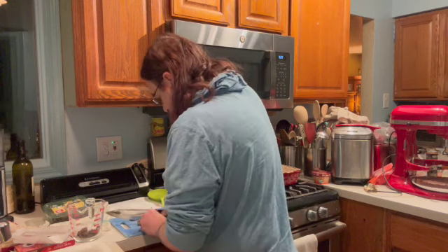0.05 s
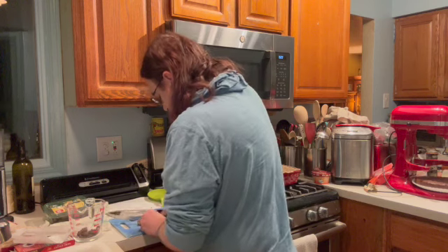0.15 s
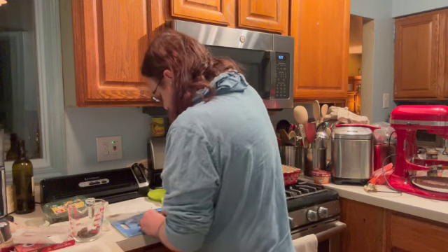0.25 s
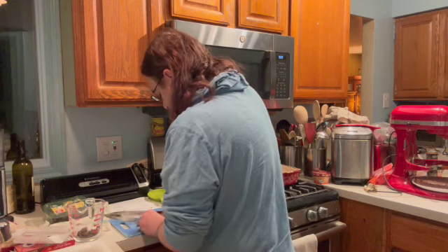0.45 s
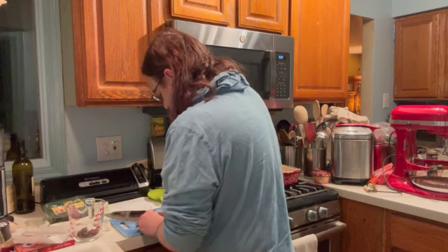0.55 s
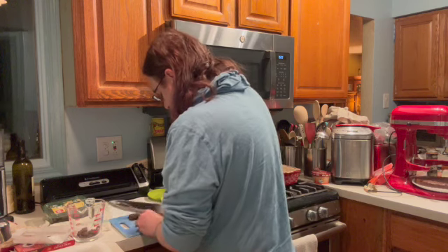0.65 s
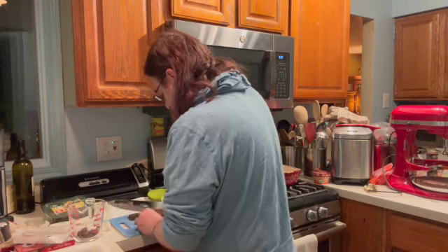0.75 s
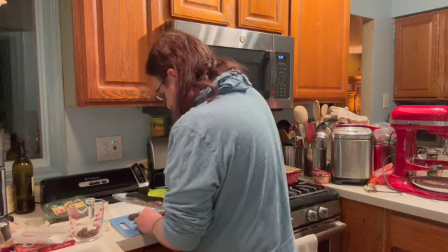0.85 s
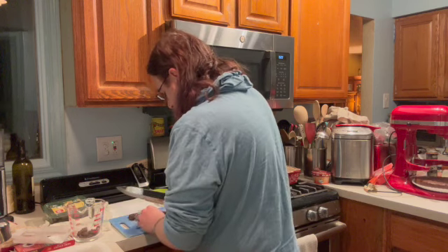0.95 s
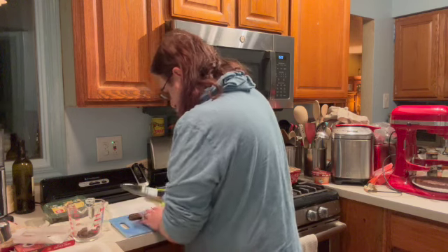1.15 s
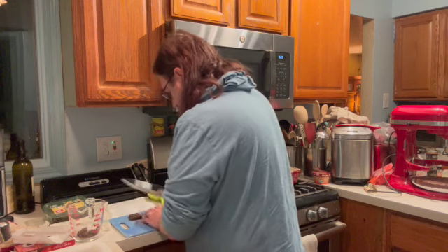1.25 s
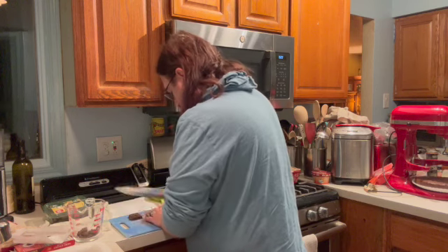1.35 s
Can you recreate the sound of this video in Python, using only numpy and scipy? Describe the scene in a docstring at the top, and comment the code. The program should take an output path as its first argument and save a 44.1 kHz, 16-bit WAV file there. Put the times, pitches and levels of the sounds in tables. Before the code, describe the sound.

One knife chop lands on a plastic cutting board at about 0.2 seconds: a very brief crunch of food runs into a sharp, hollow bang, with a low thump from the counter. Board and blade ring briefly, fading by about 0.5 seconds in a small kitchen. Faint scrapes of knife and hand on the board follow until about 1.4 seconds. A low appliance hum continues throughout.

```python
"""One chop of a kitchen knife onto a plastic cutting board, in a small, hard-walled kitchen.
The blade crunches through a piece of food in a spray of tiny fractures, then bangs onto the board.
Board and blade ring, the counter beneath booms and the room answers with a short tail.
Faint scrapes of knife and hand on the board follow, over the hum of an appliance."""
import sys
import numpy as np
from scipy import signal
from scipy.fft import rfft, irfft
from scipy.io import wavfile
from scipy.ndimage import uniform_filter1d

SR = 44100
rng = np.random.default_rng(int(sys.argv[2]) if len(sys.argv) > 2 else 0)


def wrap_up_sound(samples):
    """Save the sound to the file named by the first command line argument, as 16-bit audio."""
    columns = np.atleast_2d(samples).T
    # keep every value between -1 and 1, then stretch to whole-number steps
    tamed = np.clip(columns, -1, 1)
    steps = np.round(tamed * 32767).astype(np.int16)
    wavfile.write(sys.argv[1], SR, steps)


N = 61739
T = np.arange(N) / SR
HZ = np.maximum(np.arange(N // 2 + 1) * SR / N, 1)
BITE_S, PRESS_S, CHOP_S = 0.2068, 0.2197, 0.2279   # the blade bites, bears down, meets the board

# stereo image of the noise layers: freq_hz, left_right_correlation
STEREO_IMAGE = [(120, 0.92), (220, -0.023), (350, 0.2), (700, .1), (1400, 0.22), (2800, 0.094),
                (5000, 0.16), (9000, -.2)]
# tone of the room's still air: freq_hz, gain_db
AIR_EQ = [(25, -11.5), (55, 3), (110, 0.5), (190, -8.5), (300, -17), (470, -16), (800, -27), (2000, -33.5),
          (5000, -38.5), (13000, -45), (15000, -67.5)]
# appliance motor and mains hum: pitch_hz, rms_db
HUM_PARTIALS = [(56.6, -44.5), (119.4, -53), (239.5, -71.5)]
# knife and hand sliding on the board: peak_s, hiss_db, rise_s, t60_s, tilt_db_per_octave, ring_db
SCRAPE_STROKES = [(.06, -60, 0.3, 0.38, -1.5, -76.5), (.51, -64.5, 0.29, 0.84, -0.5, -86),
                  (0.593, -61.5, 0.034, 0.34, 2, -64), (.66, -68, 0.24, 1.35, 2, -76),
                  (0.796, -63, 0.15, .3, -1.5, -69), (1.08, -66, 0.049, 0.49, -5, -91.5),
                  (1.13, -72, 0.18, 2.5, 2.5, -86), (1.34, -61.5, 0.05, 0.24, -3.5, -81.5),
                  (1.398, -65.5, 0.069, 0.34, -2, -70.5)]
# tone of the sliding hiss: freq_hz, gain_db
SCRAPE_EQ = [(200, -2), (500, 5), (1200, -6.5), (2500, -2), (5000, -8), (8000, -8.5), (10000, -22),
             (13300, -6.5), (15000, -44)]
# resonances that sliding excites: pitch_hz, strength_db
SCRAPE_MODES = [(860, -4.5), (1110, 3), (1500, -6.5), (1682, -2), (2635, -4), (4900, -9.5)]
# tone of the reverb: freq_hz, gain_db
REVERB_EQ = [(100, -7), (250, -8), (450, 1), (800, -4.5), (1600, -2), (2600, -2), (4000, -6), (6500, -10),
             (8600, -17.5), (10500, -26.5), (13500, -26), (14800, -61)]
# decay of the reverb: freq_hz, t60_s
REVERB_DECAY = [(100, 0.33), (500, 0.32), (2000, 0.36), (5000, .32), (8000, .25), (13000, 0.21)]
# low room modes: pitch_hz, level_db, attack_s, t60_s
ROOM_MODES = [(84, -29.5, 0.013, .25), (109.8, -26, 0.079, .13)]
# the counter flexing, then settling: start_s, pitch_hz, level_db, attack_s, hold_s, t60_s
COUNTER_BOOMS = [(0.2378, 103.4, -12.5, .017, .009, .045), (0.362, 88.5, -36, 0.024, 0.0026, .12)]
# tone of breaking food: freq_hz, gain_db
CRUNCH_EQ = [(100, 1.5), (220, -9), (400, 2), (700, -1.5), (1200, 2), (1800, -8), (3200, -9), (6000, -21.5),
             (14000, -50)]
# modes of the board: pitch_hz, strength_db, t60_s
BOARD_TONES = [(409.5, 0.5, .13), (597.5, -2.5, .16), (618.6, 4.5, .25), (753.5, -1, .17), (896, -4, 0.17),
               (1055, -6, .26), (1508, -1, .37), (1625, -3, .27), (1690, -1, 0.2), (1900, -2.5, 0.3)]
# modes of the blade: pitch_hz, strength_db, t60_s
BLADE_TONES = [(2317, 3, 0.28), (2400, -5, .34), (2634, -7.5, .26), (3028, -5.5, 0.19), (3105, 1, .15),
               (3292, -2, .16), (3707, -3, .22), (4266, -6.5, .2), (8830, -6, 0.14)]
# dense, quickly damped ringing of board and worktop: freq_hz, gain_db
CLACK_EQ = [(150, -17.5), (280, -18.5), (420, -8), (640, 6), (1050, -2), (1650, 2), (2050, -9.5), (2400, 1),
            (3100, 3.5), (4100, -8.5), (4800, -4.5), (6500, -17.5), (9000, -19.5), (13500, -28.5),
            (14800, -57)]
# tone of the edge's first contact: freq_hz, gain_db
CRACK_EQ = [(200, -21), (900, -4), (1900, -2.5), (2800, 2), (4100, -6), (5000, -6.5), (9000, -15),
            (13000, -17.5), (16000, -34)]


def from_db(db):
    """Decibels to gain."""
    return 10 ** (np.asarray(db) / 20)


def unit_rms(x):
    """Scale to an rms of 1."""
    return x / np.sqrt(np.mean(x ** 2) + 1e-20)


def at_hz(curve, hz):
    """Read a curve on a log-frequency axis."""
    freqs, values = np.transpose(curve)
    return np.interp(np.log(hz), np.log(freqs), values)


def drift(per_s):
    """Slow random wander with a spread of about 1."""
    knots = rng.standard_normal(4096)
    return np.interp(T * per_s, np.arange(len(knots)), knots)


def envelope(start, attack, hold, t60):
    """Smooth rise, hold and exponential release, all in seconds."""
    age = T - start
    rise = np.sin(np.pi / 2 * np.clip(age / attack, 0, 1)) ** 2
    return rise * from_db(-60 * np.maximum(age - attack - hold, 0) / t60)


def stereo_noise(eq, tilt_db=0):
    """Shaped noise, centred in the bass and wide above, tilted by tilt_db per octave; rms 1."""
    mid, side = rfft(rng.standard_normal((2, N)))
    correlation = at_hz(STEREO_IMAGE, HZ)
    pair = np.sqrt(1 + correlation) * mid + np.sqrt(1 - correlation) * side * np.array([[1], [-1]])
    return unit_rms(irfft(pair * from_db(at_hz(eq, HZ) + tilt_db * np.log2(HZ)), N))


def low_tone(start, hz, db, attack, hold, t60):
    """A sine that swells and dies away."""
    return from_db(db) * envelope(start, attack, hold, t60) * np.sin(2 * np.pi * hz * (T - start))


def through_modes(burst, lift_db, width_hz=37):
    """Gather a burst's energy round the modes of board and blade, keeping its broad tone."""
    mid_side = np.array([[1, 0.91], [1, -1]]) / np.sqrt(2)
    spectrum = rfft(mid_side @ burst)
    peaks = 1 + sum(from_db(lift_db + db) ** 2 / (1 + (2 * (HZ - hz) / width_hz) ** 2)
                    for hz, db, _ in BOARD_TONES + BLADE_TONES)
    power = abs(spectrum) ** 2
    fine, broad = (abs(uniform_filter1d(power, size=bins)) + 1e-9 for bins in (60, 600))
    flatten = broad / fine   # evens out the noise's own chance peaks
    gain = np.sqrt(flatten * peaks / uniform_filter1d(peaks, size=600))
    gate = np.clip((T - CHOP_S) / 0.0012, 0, 1)   # no ringing ahead of the hit
    return mid_side @ irfft(spectrum * gain, N) * gate


def room_tone():
    """The still air of the kitchen: a soft, dark bed of noise."""
    return from_db(-56.5) * stereo_noise(AIR_EQ)


def appliance_hum(waver_db=0.47):
    """A motor and the mains drone low, each partial wavering slightly in level."""
    hum = 0
    for hz, db in HUM_PARTIALS:
        gain = np.sqrt(2) * from_db(db + waver_db * drift(per_s=22))
        hum = hum + gain * np.sin(2 * np.pi * (hz * T + rng.random()))
    return hum


def scrapes(width_hz=53, grain_db=1):
    """Knife and hand slide in soft, grainy strokes that hiss and set the board ringing."""
    resonance = sum(from_db(db) / (1 + 2j * (HZ - hz) / width_hz) for hz, db in SCRAPE_MODES)
    ring = unit_rms(irfft(rfft(rng.standard_normal((2, N))) * resonance, N))
    slides = 0
    for peak_s, hiss_db, rise, t60, tilt_db, ring_db in SCRAPE_STROKES:
        stroke = from_db(grain_db * drift(per_s=280)) * envelope(peak_s - rise, rise, 0, t60)
        hiss = from_db(hiss_db) * stereo_noise(SCRAPE_EQ, tilt_db)
        slides = slides + stroke * (hiss + from_db(ring_db) * ring)
    return slides


def blade_rasp(pitch_hz=2650, width_hz=250):
    """The blade comes free with a faint, narrow band of friction noise."""
    band = signal.iirpeak(pitch_hz, pitch_hz / width_hz, fs=SR)
    rasp = unit_rms(signal.lfilter(*band, rng.standard_normal((2, N))))
    return from_db(-74) * rasp * envelope(start=0.85, attack=0.031, hold=0.13, t60=0.2)


def kitchen_reverb():
    """The chop's reflections off hard walls build and die away, each octave at its own rate."""
    spectrum = rfft(stereo_noise(REVERB_EQ))
    octave = np.log2(np.clip(HZ, 100, 12800) / 100)
    tail = 0
    for k in range(8):
        band = irfft(spectrum * np.maximum(1 - abs(octave - k), 0), N)
        tail = tail + band * envelope(CHOP_S, attack=0.01, hold=0, t60=at_hz(REVERB_DECAY, 100 * 2 ** k))
    return through_modes(from_db(-19.5) * tail, lift_db=5.5)


def room_bloom():
    """The room's low modes swell from the moment the blade bears down."""
    return sum(low_tone(PRESS_S, hz, db, attack, 0, t60) for hz, db, attack, t60 in ROOM_MODES)


def counter_boom():
    """The counter flexes under the blow for a few deep cycles, then settles."""
    return sum(low_tone(*boom) for boom in COUNTER_BOOMS)


def food_crunch(snaps_per_s=2500, midway_db=-28.5, growth_db=24):
    """Tiny fractures in the food, growing louder until the blade is through."""
    progress = (T - BITE_S) / (CHOP_S - BITE_S)
    cutting = (progress > 0) & (progress < 1)
    swell = cutting * from_db(midway_db + growth_db * (np.clip(progress, 0, 1) - 0.5))
    fractures = unit_rms((rng.random(N) < snaps_per_s / SR) * rng.standard_normal(N)) * swell
    snap = stereo_noise(CRUNCH_EQ) * envelope(0, attack=0.00066, hold=0, t60=0.049)
    snap /= np.sqrt(np.sum(snap ** 2) / 2)   # unit energy per channel
    return signal.fftconvolve(fractures[None], snap, axes=1)[:, :N]


def board_and_blade_ring(base_db=-28.5, tilt_db_per_octave=-2.5, waver_db=3, spread_rad=1.1):
    """Each struck mode rings out as a clear, hollow tone that swells and dips unevenly."""
    ring, lowest_hz = 0, BOARD_TONES[0][0]
    for hz, db, t60 in BOARD_TONES + BLADE_TONES:
        phase = 2 * np.pi * rng.random()
        stereo_offset = spread_rad * rng.uniform(0.5, 1) * np.array([[1], [-1]])
        tone = np.sin(2 * np.pi * hz * T + phase + stereo_offset)
        tilt_db = tilt_db_per_octave * np.log2(hz / lowest_hz)
        gain = from_db(base_db + db + tilt_db + waver_db * drift(per_s=45))
        ring = ring + gain * tone * envelope(CHOP_S, attack=0.012, hold=0, t60=t60)
    return ring


def knife_chop():
    """The edge lands with a bright crack; board and worktop give it body with a resonant clack."""
    crack = stereo_noise(CRACK_EQ) * envelope(CHOP_S, attack=0.0016, hold=0.0008, t60=0.023)
    clack = stereo_noise(CLACK_EQ) * envelope(CHOP_S, attack=0.0018, hold=0.012, t60=0.08)
    return from_db(-11) * crack + through_modes(from_db(-11.5) * clack, lift_db=17.5)


def scene():
    """Mix the layers from back to front, with a quick fade-in."""
    bed = room_tone() + appliance_hum()
    handling = scrapes() + blade_rasp()
    room = kitchen_reverb() + room_bloom()
    hit = counter_boom() + food_crunch() + board_and_blade_ring() + knife_chop()
    return (bed + handling + room + hit) * np.clip(T / 0.006, 0, 1)


def record(dry, ceiling=0.9, cutoff_hz=16000):
    """Soft-clip the highest peaks and cut the extreme top."""
    rounded = dry / (1 + (dry / ceiling) ** 6) ** (1 / 6)
    return signal.sosfilt(signal.cheby2(12, 60, cutoff_hz, fs=SR, output="sos"), rounded)


dry = scene()
out = record(dry)
wrap_up_sound(out)
```